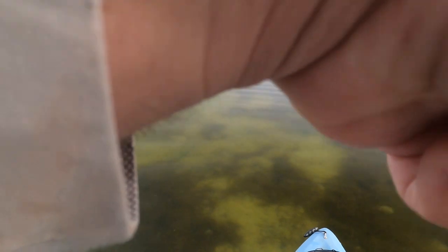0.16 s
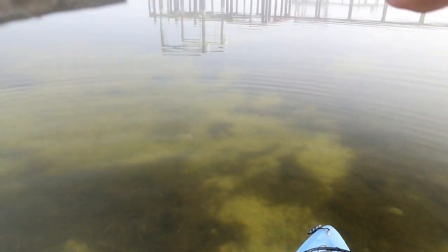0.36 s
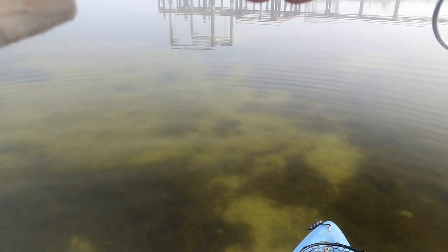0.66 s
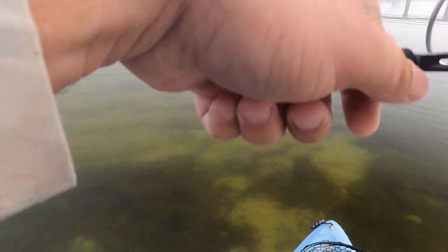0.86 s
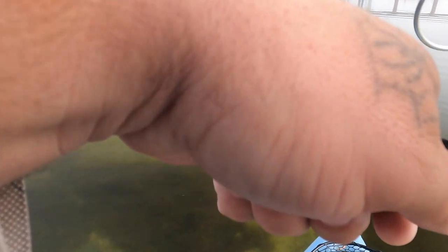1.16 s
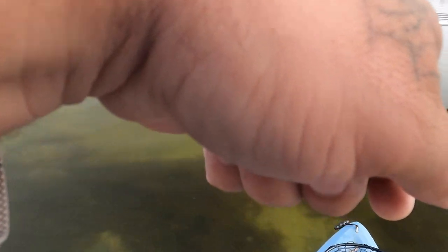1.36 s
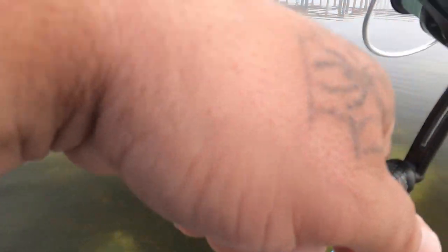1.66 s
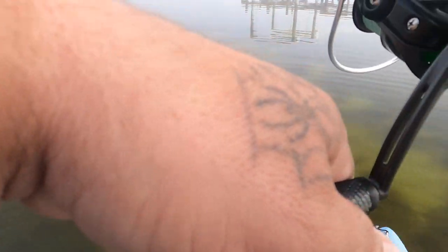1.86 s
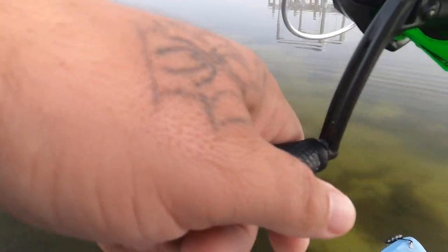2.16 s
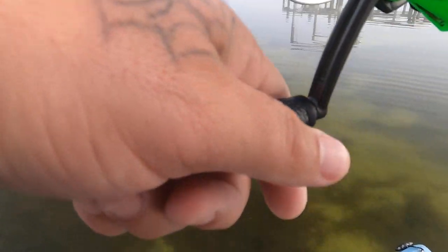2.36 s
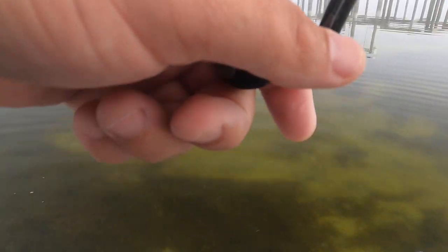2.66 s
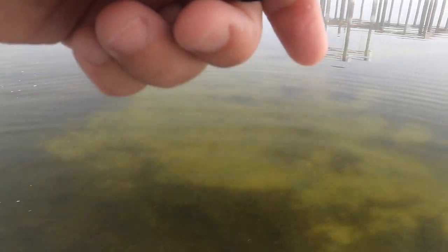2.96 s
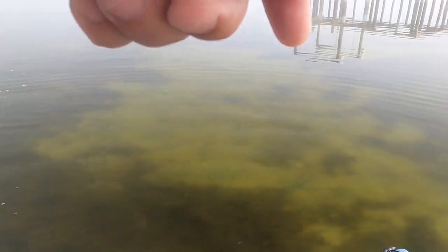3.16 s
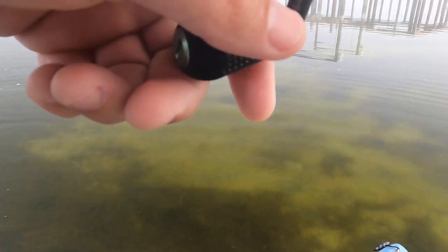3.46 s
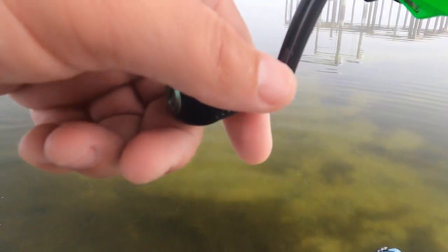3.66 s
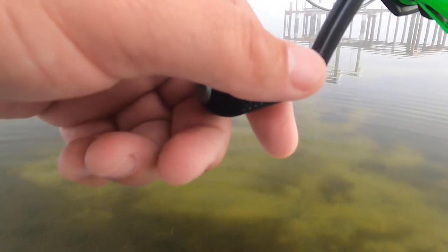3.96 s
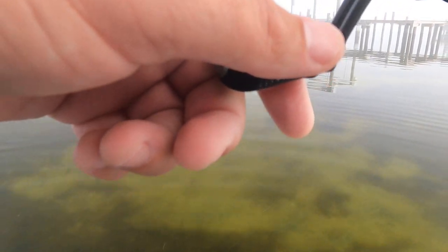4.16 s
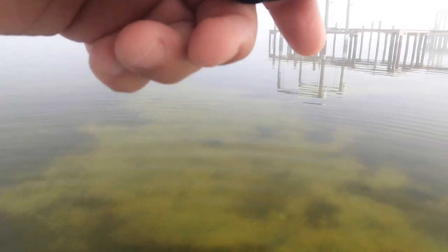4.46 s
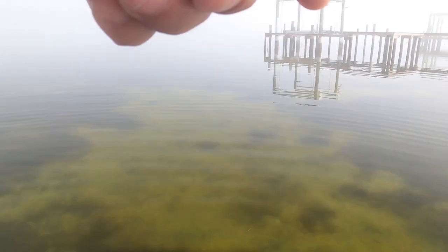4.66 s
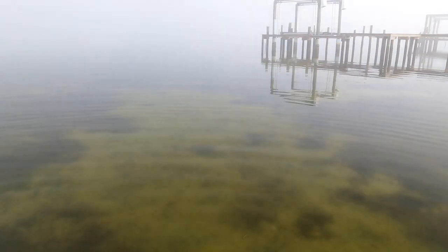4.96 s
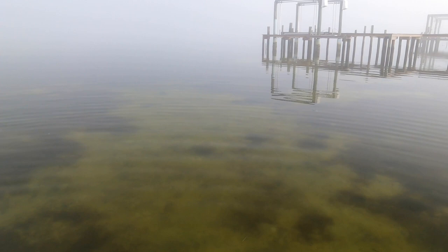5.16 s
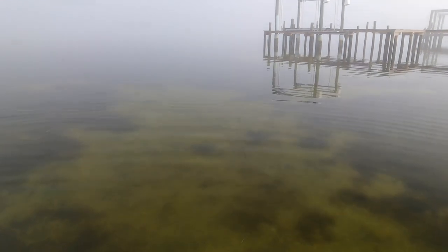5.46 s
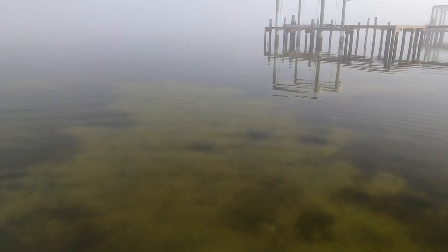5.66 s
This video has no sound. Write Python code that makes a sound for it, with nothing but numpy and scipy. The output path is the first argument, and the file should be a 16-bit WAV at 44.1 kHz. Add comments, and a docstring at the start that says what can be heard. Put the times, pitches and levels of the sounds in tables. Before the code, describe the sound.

Close metallic ratchet clicks of a hand-cranked fishing reel, merging into two fast buzzing runs, with a soft low rumble outdoors.

```python
"""A fishing reel turned by hand in a small boat on calm, foggy water. From the start a distant drone
lies under a faint rustle of line and sleeve. A spring pawl snaps over a 13-tooth ratchet, each impact
exciting the damped modes of pawl, spool and body. Near 1.7 s and again near 3.2 s a fast spin merges
the ticks into a buzz, and the gears whine at their mesh frequency. The last tick falls at 4.5 s,
leaving the drone and a faint hiss of open air."""
import sys
import numpy as np
from scipy import signal
from scipy.fft import rfft, irfft
from scipy.io import wavfile
from scipy.ndimage import uniform_filter1d

SR = 44100
rng = np.random.default_rng(int(sys.argv[2]) if len(sys.argv) > 2 else 0)


def bounce(signal):
    """Save signal as a 16-bit WAV file at the path given by the first command-line argument."""
    frames = np.transpose(np.atleast_2d(signal))
    limited = np.clip(frames, -1, 1)
    pcm = np.round(limited * 32767).astype(np.int16)
    wavfile.write(sys.argv[1], SR, pcm)


N = 256265


def amp(db):
    """Amplitude ratio: a factor of ten per 20 dB."""
    return 10 ** (np.asarray(db, float) / 20)


def unit_rms(x):
    """Normalisation to unit mean power."""
    return x / np.sqrt(np.mean(x ** 2) + 1e-20)


def in_time(rows, when=None):
    """Linear interpolation of each column, at every sample or at given times."""
    time_s, *columns = np.transpose(rows)
    return [np.interp(np.arange(N) / SR if when is None else when, time_s, c) for c in columns]


def at_hz(points, hz):
    """Interpolation of a spectrum on a logarithmic frequency axis."""
    frequency_hz, values = np.transpose(points)
    return np.interp(np.log(hz + 1), np.log(frequency_hz), values)


def filtered_noise(gain_at):
    """Spectral shaping: white noise multiplied by a gain at each frequency."""
    white = rfft(rng.standard_normal(N + 1))
    return irfft(white * gain_at(np.fft.rfftfreq(N + 1, 1 / SR)), N + 1)[:N]


def drift(rate_hz):
    """Random fluctuation: low-pass noise of unit rms."""
    return unit_rms(filtered_noise(lambda hz: 1 / (1 + (hz / rate_hz) ** 2)))


def stereo_noise(spectrum, side_db):
    """Partial coherence: a common mid noise plus and minus an independent side noise."""
    mid, side = [filtered_noise(lambda hz: amp(at_hz(spectrum, hz))) for _ in range(2)]
    return unit_rms(mid + amp(side_db) * side * [[1], [-1]])


def narrowband(hz, width_hz):
    """Quadrature modulation: two random envelopes spread a moving pitch into a band."""
    phase = 2 * np.pi * np.cumsum(hz) / SR
    return drift(width_hz) * np.cos(phase) + drift(width_hz) * np.sin(phase)


def resonance(x, hz, width_hz):
    """Second-order resonator with unit gain at its peak."""
    r = np.exp(-np.pi * width_hz / SR)
    gain = (1 - r * r) / 2
    return signal.lfilter([gain, 0, -gain], [1, -2 * r * np.cos(2 * np.pi * hz / SR), r * r], x)


# Rumble spectrum: frequency_hz, density_db
RUMBLE = [(18, -32.5), (45, -5), (84, -4), (200, -11.5), (300, -15.5), (480, -23.5), (570, -20.5),
          (690, -27), (960, -25.5), (1120, -34), (1500, -36), (2070, -49.5), (3200, -71), (12000, -110)]
# Side signal relative to the mid: frequency_hz, level_db
RUMBLE_SIDE = [(25, -13.5), (60, -24.5), (110, -27), (200, -22), (380, -14), (700, -6), (1290, -8),
               (2400, -3.5), (8000, -5)]
# Coherence of side with mid: frequency_hz, coherence_ratio
SIDE_COHERENCE = [(60, .7), (200, .8), (400, .85), (800, 0.77), (2000, 0.48), (5000, .2)]
# Phase lag of the coherent part: frequency_hz, lag_rad
SIDE_LAG = [(60, .9), (250, .9), (500, 0.83), (1000, 1.7), (3000, 0.9)]
# Lower hum, which sinks and then holds: time_s, pitch_hz, level_db
LOW_HUM = [(0, 102, -39.5), (1.0, 95.9, -40.5), (2.2, 91.97, -49.5), (2.6, 85, -34), (4.0, 82.64, -39.5),
           (5.8, 84, -35)]
# Upper hum: time_s, pitch_hz, level_db
HIGH_HUM = [(0, 200, -45.5), (2.0, 214.8, -48.5), (3.0, 201, -56.5), (4.2, 202.7, -47.5), (5.8, 204, -42)]


def drone():
    """Broadband rumble, highly coherent between the ears, with two narrowband hums."""
    mid, independent = rfft(rng.standard_normal((2, N + 1)))
    hz = np.fft.rfftfreq(N + 1, 1 / SR)
    coherence = at_hz(SIDE_COHERENCE, hz) * np.exp(-1j * at_hz(SIDE_LAG, hz))
    side = coherence * mid + np.sqrt(1 - np.abs(coherence) ** 2) * independent
    side *= amp(at_hz(RUMBLE_SIDE, hz))
    spectrum = amp(at_hz(RUMBLE, hz)) * (mid + side * [[1], [-1]])
    rumble = unit_rms(irfft(spectrum, N + 1)[:, :N])
    hums = sum(amp(level_db) * narrowband(pitch_hz, width_hz=8)
               for pitch_hz, level_db in (in_time(LOW_HUM), in_time(HIGH_HUM)))
    return amp(-34.5 - 0.6 * drift(7.5)) * rumble + hums


# Envelopes of the rubbing: time_s, dull_db, bright_db
RUSTLE_LEVELS = [(0, -50.5, -60), (.1, -53.5, -65), (.7, -57, -75), (1.1, -60.5, -55), (1.32, -85.5, -85),
                 (2.5, -86.5, -81.5), (2.68, -62, -72), (3.05, -70.5, -80), (4.15, -59, -61),
                 (4.4, -63, -86), (4.6, -83, -86.5)]
# Spectra of its dull and bright parts: frequency_hz, density_db
RUSTLE_DULL = [(900, -30), (1400, 3), (1800, -10), (2450, -3), (2900, -9), (3400, -5.5), (4000, -11.5),
               (4700, -4), (5400, -15), (8000, -30), (14000, -61)]
RUSTLE_BRIGHT = [(2500, -28.5), (3600, -22.5), (5000, -2.5), (6300, 0.5), (7500, -4), (10000, -15),
                 (12500, -17), (15000, -42.5)]


def rustle():
    """Friction noise of line and sleeve: two bands sharing one random amplitude modulation."""
    dull_db, bright_db = in_time(RUSTLE_LEVELS)
    uneven_db = 1.2 * drift(30)
    dull = amp(dull_db + uneven_db) * stereo_noise(RUSTLE_DULL, side_db=-3.5)
    bright = amp(bright_db + uneven_db) * stereo_noise(RUSTLE_BRIGHT, side_db=-8)
    return dull + bright


# Envelope of the open-air hiss: time_s, level_db
AIR_LEVEL = [(0, -80), (4.7, -82), (5.8, -75)]
# Its spectrum: frequency_hz, density_db
AIR_SPECTRUM = [(1470, -35), (2500, -5.5), (2930, -3.5), (3190, -8.5), (3830, -10.5), (7240, -12.5),
                (12000, -35), (15600, -59.5), (22000, -120)]


def air():
    """Ambient noise of the open air, almost incoherent between the ears."""
    return amp(in_time(AIR_LEVEL)[0]) * stereo_noise(AIR_SPECTRUM, side_db=-0.5)


REEL_PAN_DB = -0.5   # left over right
COMB_DEPTH_DB, COMB_SPACING_HZ = 2, 2897


def strike(modes, start_s, angle, level_db, spread_db, jitter_s, onset_hz, deep_db=None):
    """Modal synthesis: impulses excite damped sinusoids; deep_db, if given, drives those under 4 kHz."""
    out = np.zeros((2, N))
    for hz, mode_db, t60_s, pan_db in modes:
        chance = rng.standard_normal((len(start_s), 5))
        # Neighbouring teeth strike with similar force and polarity.
        chance[:, [1, 4]] = np.sqrt(3) * uniform_filter1d(chance[:, [1, 4]], size=3, axis=0)
        delay, force, sway, skew, polarity = chance.T
        at = ((start_s + jitter_s * np.abs(delay)) * SR).astype(int)
        side_db = (REEL_PAN_DB + pan_db + 5 * sway) / 2
        drive_db = deep_db if deep_db is not None and hz < 4000 else level_db
        # Reflection off the spool forms a comb filter that slides as it turns.
        comb_db = COMB_DEPTH_DB * np.cos(2 * angle - 2 * np.pi * hz / COMB_SPACING_HZ)
        blow_db = drive_db + mode_db + comb_db + spread_db * force
        left_lag = skew > hz / 1500 - 5   # low modes tend to reach the left a sample later
        impulses = np.full((2, N), 1e-18)
        impulses[0, at + left_lag] = amp(blow_db + side_db) * np.sign(polarity)
        impulses[1, at] = amp(blow_db - side_db) * np.sign(polarity)
        r, w = amp(-60 / (t60_s * SR)), 2 * np.pi * hz / SR
        ring = signal.lfilter([0, np.sin(w)], [1, -2 * r * np.cos(w), r * r], impulses)
        out += resonance(ring, hz, onset_hz)   # finite contact time: the ring swells in
    return out


# Modes of pawl, spool and body, grouped as excited together: pitch_hz, level_db, t60_s, pan_db
LOW_MODES = [(1950, -30.5, 0.0078, -10), (2722, -29.5, 0.014, -9), (3280, -18.5, 0.0042, -6),
             (4315, -8, 0.0072, -0.5), (5010, -8, 0.0093, -3), (5425, 3, 0.0032, -3), (5820, 6, 0.0017, -4)]
HIGH_MODES = [(6720, -6, 0.0027, 0), (7260, -10, 0.009, 0.017), (7750, -4.5, 0.0052, 0),
              (8980, -13.5, .004, 0), (11550, -17, 0.0026, 0.014), (13400, -15.5, .002, 0.0035),
              (14300, -30.5, .002, 0)]
BRIGHT_MODES = [(9300, -16, .004, 0), (9950, -5, .016, 0), (10600, -8, .004, 0), (12070, -11, .018, 0),
                (13150, -36, .02, 0)]
# Drive of the modes above the level of their band: deep_db, high_db, bright_db
MODE_LIFT = [26, 12, 10]


def pawl_snaps(start_s, angle, level_db, deep_db, high_db, bright_db):
    """Impact excitation: each blow divides between low and high modes and rings bright metal ones."""
    deep_lift_db, high_lift_db, bright_lift_db = MODE_LIFT
    high_share = np.clip(amp(2 * (high_db + 8.5)), 0, .8)   # fraction of the power
    low_db = level_db + 10 * np.log10(1 - high_share) - 6
    low = strike(LOW_MODES, start_s, angle, low_db, spread_db=1.5, jitter_s=.00015, onset_hz=1850,
                 deep_db=level_db + deep_db + deep_lift_db)
    high = strike(HIGH_MODES, start_s, angle, level_db + high_db + high_lift_db,
                  spread_db=2.1, jitter_s=.0002, onset_hz=1799)
    bright = strike(BRIGHT_MODES, start_s, angle, bright_db + bright_lift_db,
                    spread_db=4, jitter_s=.00063, onset_hz=1210)
    return low + high + bright


# Lingering metallic ring of the pawl, damped by each new tooth: pitch_hz, level_db, t60_s, pan_db
PAWL_RING_MODES = [(4095, -21, .22, -2), (5120, -13, .08, -2), (5530, 0, .13, -2), (8290, -22, .28, 0)]


def pawl_ring(start_s, level_db, surviving=0.51, swell_s=0.00068):
    """Superposition: each contact damps the remaining vibration and adds a new one in random phase."""
    order = np.argsort(start_s)
    at = (start_s[order] * SR).astype(int)
    latest = np.searchsorted(at, np.arange(N), side="right") - 1
    since_s = (np.arange(N) - at[latest]) / SR * (latest >= 0)
    out = np.zeros((2, N))
    for hz, mode_db, t60_s, pan_db in PAWL_RING_MODES:
        pole = 2j * np.pi * hz - np.log(1000) / t60_s
        force, phase = rng.standard_normal((len(at), 2)).T
        spread_db = 2 if mode_db == 0 else 5   # the weaker modes vary more
        phasor = amp(level_db[order] + mode_db + spread_db * force) * np.exp(3j * phase)
        for k in range(1, len(at)):
            phasor[k] += surviving * phasor[k - 1] * np.exp(pole * (at[k] - at[k - 1]) / SR)
        ring = np.imag(phasor[latest] * np.exp(pole * since_s)) * (1 - np.exp(-since_s / swell_s))
        out += ring * amp((REEL_PAN_DB + pan_db) / 2 * np.array([[1], [-1]]))
    return out


# Single ticks of the pawl: start_s, level_db, deep_db, high_db, bright_db, ring_db
# (deep_db and high_db are relative to level_db)
TICKS = [(0.0219, -27.5, -12, -15, -30.5, -44), (0.067, -27, -35, -11.5, -41, -46),
         (0.1626, -22, -36, -9.5, -48.5, -57), (0.2728, -26, -26, -20, -45, -41),
         (0.4241, -23.5, -25, -14, -37, -53), (0.4856, -18.5, -42, -9.5, -40, -55.5),
         (0.5284, -19.5, -31, -15, -36.5, -44.5), (0.5769, -23.5, -18, -14, -43.5, -43.5),
         (0.621, -16.5, -28, -10.5, -43.5, -48), (0.648, -20, -28, -8.5, -36, -46.5),
         (0.6738, -17.5, -30, -11, -38.5, -40), (0.701, -21, -25, -13.5, -37, -47.5),
         (0.7312, -20.5, -29, -19, -37, -46), (0.7707, -23.5, -18.5, -16, -42.5, -50),
         (0.8214, -22.5, -31, -13, -51, -49), (0.8931, -17, -31, -13.5, -43.5, -52),
         (0.967, -19.5, -26, -10.5, -36.5, -44), (1.0136, -15, -33, -15, -40, -52),
         (1.041, -16, -28, -17, -42, -48), (1.064, -20.5, -26, -16, -37, -45),
         (1.087, -21, -26, -15, -38, -53), (1.1099, -18, -32, -17, -34, -46),
         (1.1326, -20, -22, -13, -40, -41), (1.1546, -19, -25, -11.5, -35, -37),
         (1.177, -20, -23, -15, -36.5, -50), (1.2013, -20.5, -20.5, -16, -34, -40),
         (1.2321, -24, -22, -14, -35.5, -44), (1.279, -24, -19.5, -15, -40.5, -44.5),
         (1.6053, -23.5, -23, -15, -42.5, -46), (1.6561, -16, -28, -17.5, -41, -39),
         (1.6864, -14.5, -28, -13, -36.5, -47.5), (1.709, -16.5, -26, -12.5, -37, -56),
         (1.724, -21, -25, -10, -34, -47.5), (2.407, -23, -13, -18, -40, -56),
         (2.4205, -20, -29, -20, -38, -44), (2.4372, -16, -30, -19, -41, -37),
         (2.4555, -14.5, -24, -17, -40, -38), (2.474, -18, -22, -17, -43, -36),
         (2.4916, -16.5, -23, -19, -39, -43), (2.5077, -23, -16, -13, -44, -46.5),
         (2.5243, -19.5, -20, -11, -40, -46), (2.541, -16, -23.5, -20, -39, -46),
         (2.5596, -18.5, -20, -13, -42, -46), (2.58, -20, -18, -11, -38.5, -35.5),
         (2.604, -20.5, -19.5, -20, -43, -39), (2.6362, -21.5, -18.5, -16, -43.5, -50),
         (2.6933, -25, -20.5, -15, -39, -53), (3.1219, -21.5, -28.5, -18, -42, -50.5),
         (3.1842, -17, -28, -24, -48.5, -44), (3.2097, -17, -29, -17, -39, -48),
         (3.2267, -16, -25, -19.5, -47.5, -43), (3.9779, -21, -20, -15, -42, -43),
         (3.9948, -14.5, -36, -18, -42, -45.5), (4.0143, -16, -28, -21, -35, -40),
         (4.0382, -17, -27, -19.5, -43.5, -44), (4.0645, -16, -29, -25.5, -38.5, -46),
         (4.094, -22, -19, -20, -40, -41), (4.123, -19.5, -20, -16, -43, -39),
         (4.154, -13, -31, -15.5, -46, -54), (4.1876, -16.5, -23.5, -14, -51, -44),
         (4.2284, -16.5, -22, -15.5, -44, -39), (4.2956, -16, -23, -17, -53, -40),
         (4.5119, -21.5, -22.5, -16.5, -49, -50)]


def ratchet():
    """An impact train: the pawl falls once per tooth, heard as ticks when slow and a buzz when fast."""
    single = np.c_[TICKS, rng.uniform(0, 2 * np.pi, len(TICKS))]   # the spool stands at any angle
    single[:, 0] += .0009   # each tick sounds 0.9 ms after its listed time
    ticks = np.vstack([single, spin_ticks()])
    start_s, level_db, deep_db, high_db, bright_db, ring_db, angle = ticks.T
    snaps = pawl_snaps(start_s, angle, level_db, deep_db, high_db, bright_db)
    return snaps + pawl_ring(start_s, ring_db)


# Echoes off hands and hull: left_delay_s, right_delay_s, level_db
ECHOES = [(.0011, 0.0003, -27.5), (.0026, 0.0026, -25), (.0068, .0074, -22.5)]


def reflections(x, tail_db=-39, t60_s=.075):
    """Convolution with early echoes and a short diffuse tail, different at each ear."""
    decay_db = 60 * np.arange(SR // 8) / SR / t60_s
    response = rng.standard_normal((2, SR // 8)) * amp(tail_db - decay_db)
    response[:, 0] = 1   # direct sound
    for *delays_s, echo_db in ECHOES:
        response[[0, 1], (np.array(delays_s) * SR).astype(int)] += amp(echo_db)
    return signal.fftconvolve(x, response, axes=1)[:, :N]


def teeth(spin):
    """Uniform rotation between waypoints gives the number and time of each tooth."""
    time_s, passed = np.transpose(spin)
    tooth = np.arange(passed[0], passed[-1] + 1)
    return tooth, np.interp(tooth, passed, time_s)


# Rotation in the fast spins, one list each: time_s, teeth_passed
SPINS = [
    [(1.7389, 6), (1.781, 11), (1.8529, 22), (1.8833, 27), (1.915, 33), (1.9465, 40), (1.9926, 49),
     (2.0227, 54), (2.0495, 58), (2.0964, 66), (2.1548, 75), (2.2776, 91), (2.3965, 103)],
    [(3.2416, 12), (3.2636, 14), (3.3256, 21), (3.3849, 27), (3.421, 31), (3.4625, 36), (3.6284, 61),
     (3.715, 73), (3.8178, 85), (3.8495, 88), (3.9647, 98)],
]
# Shadowing and timbre, one row a spin: offset_turns, full_turn_db, half_turn_db, deep_db, bright_db
SPIN_TIMBRE = [(.0092, 7, 3, -23, -38), (-0.015, 4.5, 5, -30.5, -41.5)]
# Snap strength before shadowing: time_s, level_db
SPIN_LEVEL = [(1.74, -13), (1.95, -15.5), (2.25, -15.5), (2.4, -17), (3.24, -17), (3.45, -16), (3.8, -13.5),
              (3.97, -17)]


def spin_ticks(teeth_per_turn=13):
    """Acoustic shadowing: the spool screens the pawl twice a turn. Rows as in TICKS, plus angle_rad."""
    rows = []
    for spin, (offset_turns, full_turn_db, half_turn_db, deep_db, bright_db) in zip(SPINS, SPIN_TIMBRE):
        tooth, start_s = teeth(spin)
        start_s += 0.00019 * rng.standard_normal(len(tooth))
        angle = 2 * np.pi * (tooth / teeth_per_turn + offset_turns)
        facing = np.cos(angle)
        shadow_db = full_turn_db * np.maximum(facing, 0) ** 3.3
        shadow_db += half_turn_db * np.maximum(-facing, 0) ** 8.2
        level_db = in_time(SPIN_LEVEL, start_s)[0] - shadow_db
        high_db = -17 + 1.5 * np.sin(2 * angle + 0.42)   # the timbre swings twice a turn
        ring_db = -42 + 5 * rng.standard_normal(len(tooth))   # independent of the snap's strength
        each = np.ones(len(tooth))
        rows.append(np.c_[start_s, level_db, deep_db * each, high_db, bright_db * each, ring_db, angle])
    return np.vstack(rows)


def tooth_rate():
    """Frequency as the reciprocal of period: teeth per second from the gaps between ticks, smoothed."""
    spin_times = [teeth(spin)[1] for spin in SPINS]
    time_s = np.sort(np.hstack([0, np.array(TICKS)[:, 0], N / SR] + spin_times))
    midpoint_s = (time_s[1:] + time_s[:-1]) / 2
    log_rate, = in_time(np.c_[midpoint_s, np.log(1 / np.diff(time_s))][1:])
    return np.exp(uniform_filter1d(log_rate, size=SR // 30))


def speed_gain(tooth_hz, full_db, full_hz, halving_db):
    """Power law: the level falls by halving_db for each halving of the tooth rate below full_hz."""
    return amp(full_db - halving_db * np.maximum(np.log2(full_hz / tooth_hz), 0))


# Resonances of the reel body: centre_hz, width_hz, gain_db
BODY_RESONANCES = [(1236, 35, 11.5), (994.5, 180, -12.5), (1718, 30, 5.5), (2060, 73, 3)]


def gear_whine(tooth_hz, contacts_per_tooth=7.2):
    """Forced vibration: the gear-mesh frequency and its octave drive the resonances of the body."""
    mesh_hz = contacts_per_tooth * tooth_hz
    fundamental = narrowband(mesh_hz, width_hz=75)
    fundamental *= speed_gain(tooth_hz, full_db=-49.5, full_hz=60, halving_db=20)
    octave = narrowband(2 * mesh_hz, width_hz=160)
    octave *= speed_gain(tooth_hz, full_db=-55.5, full_hz=123, halving_db=23)
    flicker_db = 2.5 * drift(25)
    rolloff_db = 28 * np.maximum(np.log2(mesh_hz / 1310), 0)   # the whine thins above 1310 Hz
    tone = (fundamental + octave) * amp(flicker_db - rolloff_db)
    body = sum(amp(gain_db) * resonance(tone, hz, width_hz) for hz, width_hz, gain_db in BODY_RESONANCES)
    return (tone + body) * amp([[.3], [-.3]])


# Spectrum of the running bearings and line: frequency_hz, density_db
RUNNING_SPECTRUM = [(900, -38.5), (1600, -7.5), (2200, -2), (3200, -5.5), (4300, -1), (5500, -11),
                    (7500, -5), (10000, -9.5), (12500, -12.5), (15000, -39)]


def running_hiss(tooth_hz):
    """Friction noise of bearings and line, grainy and growing with speed."""
    grain = amp(2.5 * drift(150))
    gain = speed_gain(tooth_hz, full_db=-42.5, full_hz=105, halving_db=9.7)
    return gain * grain * stereo_noise(RUNNING_SPECTRUM, side_db=-4)


def scene():
    """Linear superposition of the reel, the rustle and the surroundings."""
    tooth_hz = tooth_rate()
    reel = reflections(ratchet()) + gear_whine(tooth_hz) + running_hiss(tooth_hz)
    return reel + rustle() + air() + drone()


def record(dry):
    """Band limiting: a steep low-pass filter, 70 dB down from 16.9 kHz."""
    return signal.sosfilt(signal.cheby2(12, 70, 16900, fs=SR, output="sos"), dry)


dry = scene()
out = record(dry)
bounce(out)
```